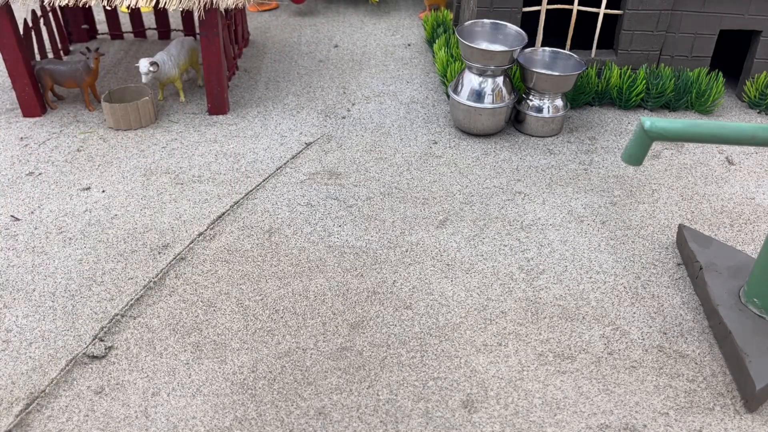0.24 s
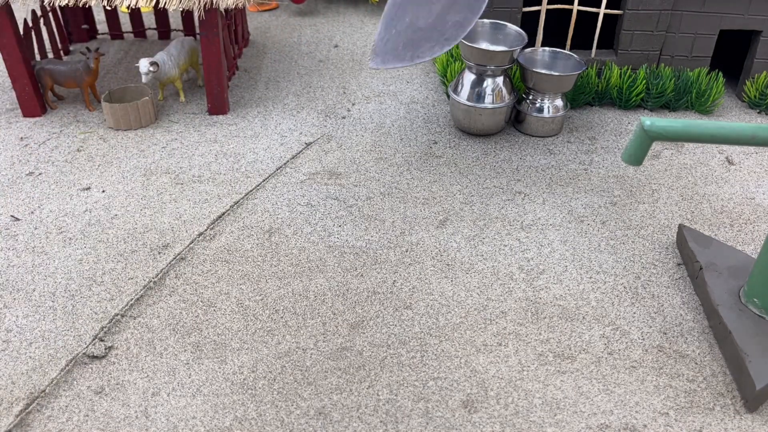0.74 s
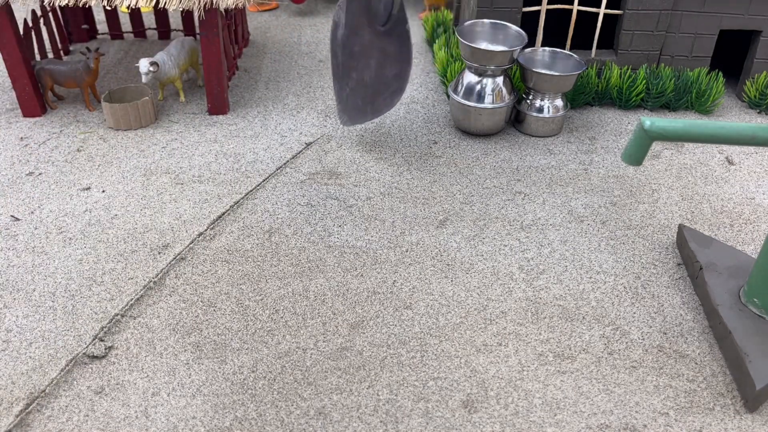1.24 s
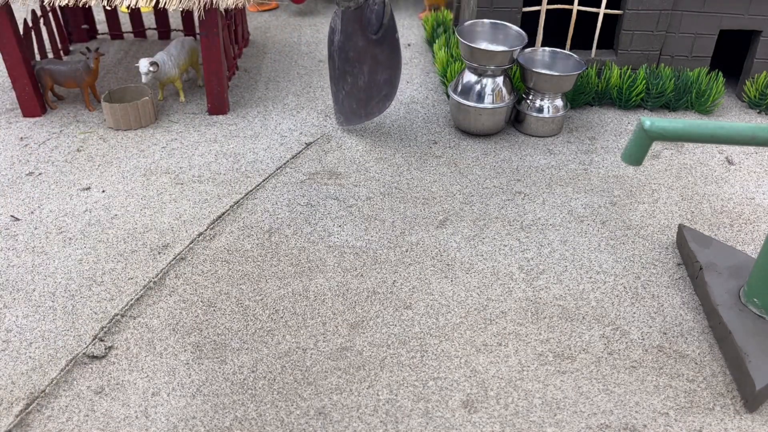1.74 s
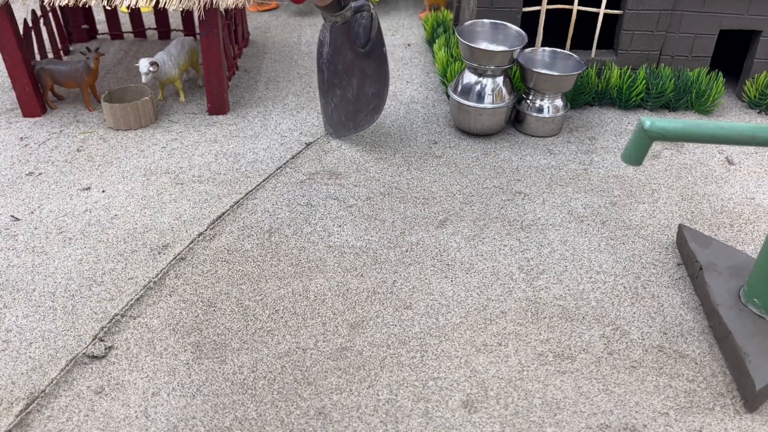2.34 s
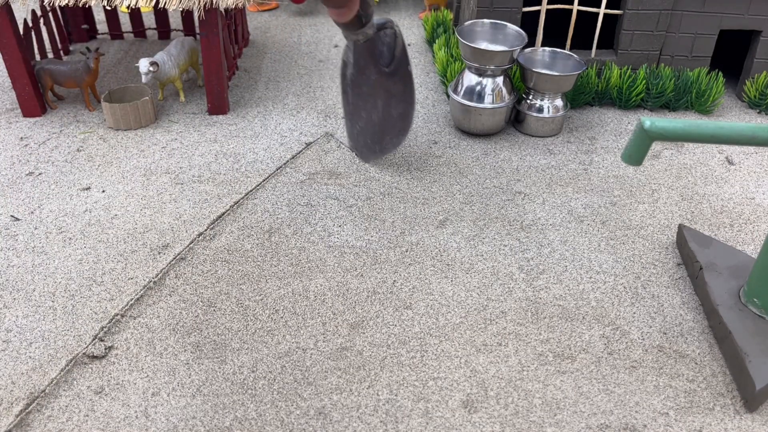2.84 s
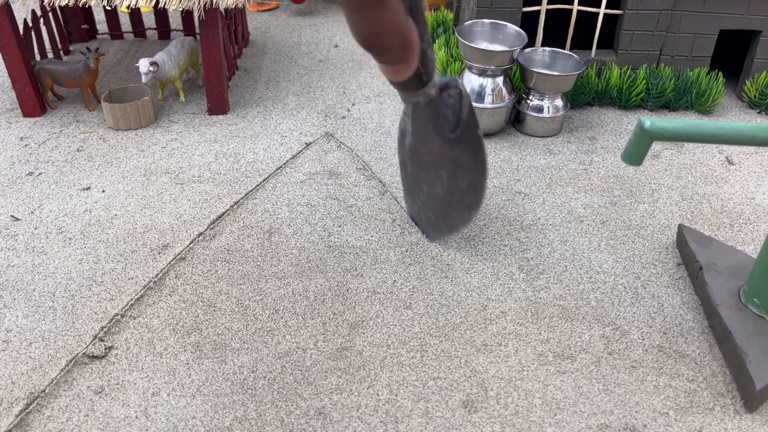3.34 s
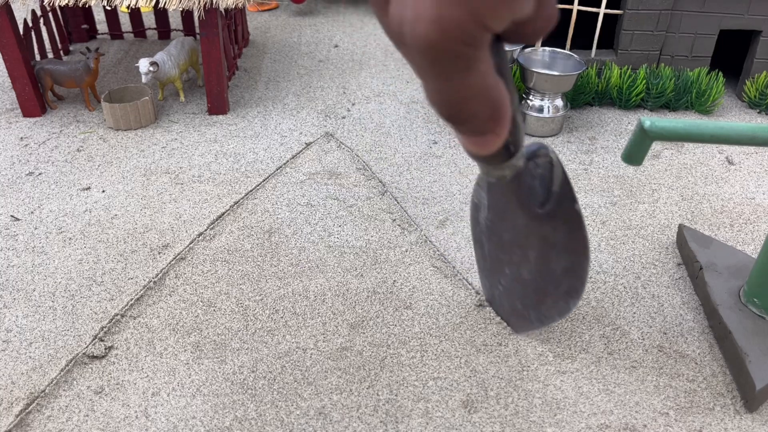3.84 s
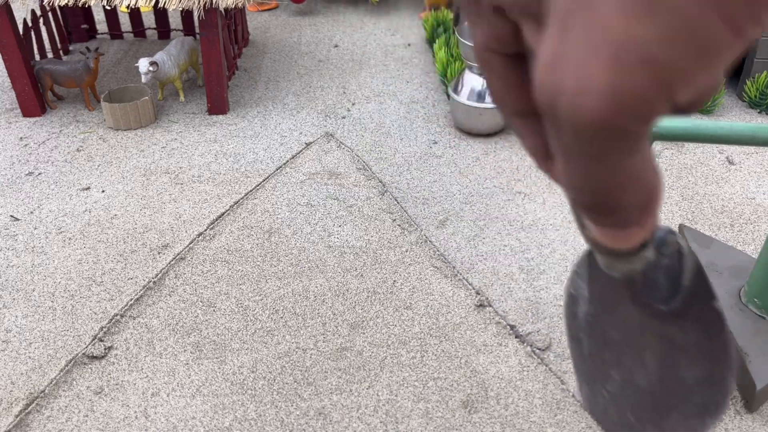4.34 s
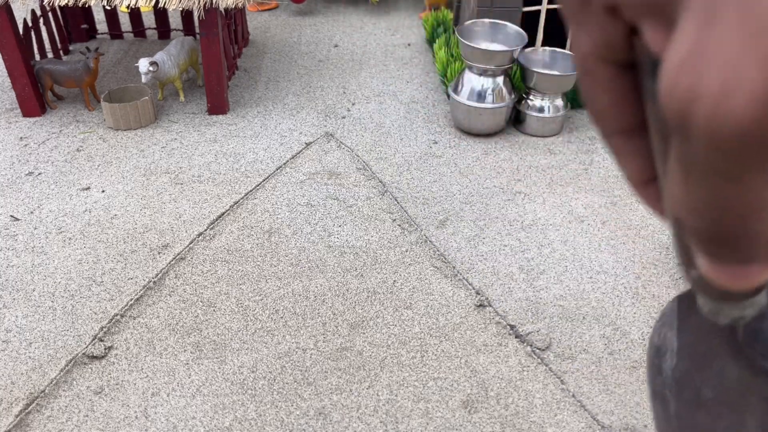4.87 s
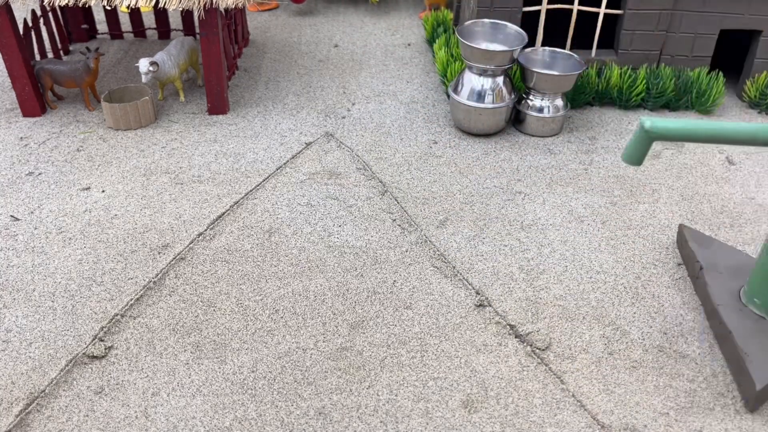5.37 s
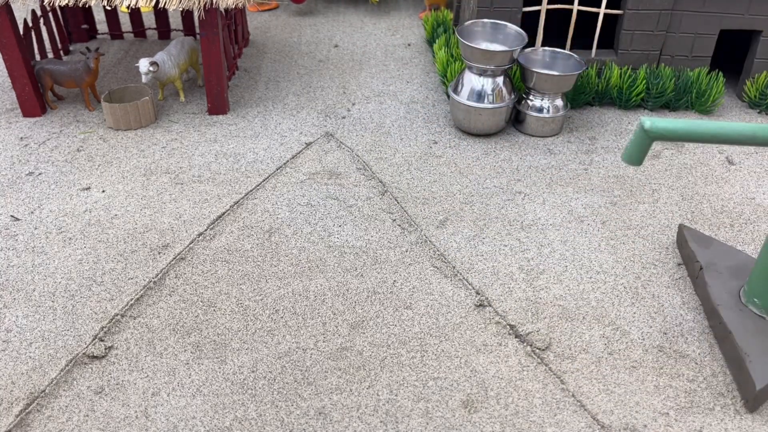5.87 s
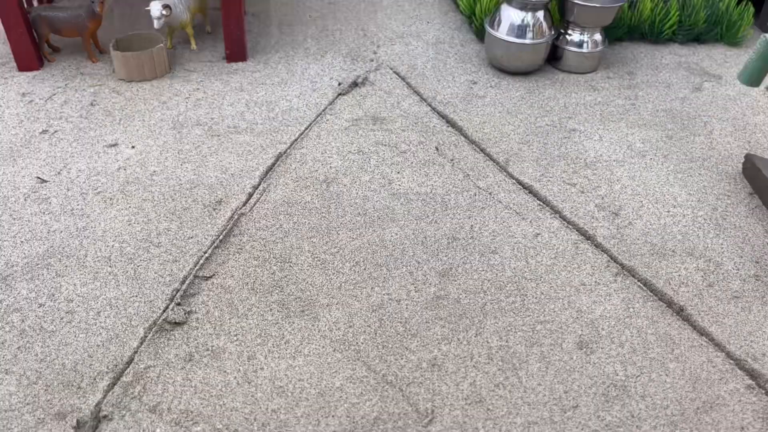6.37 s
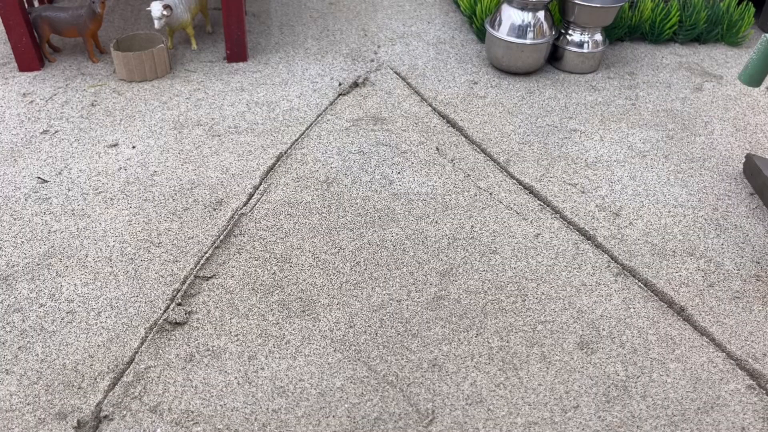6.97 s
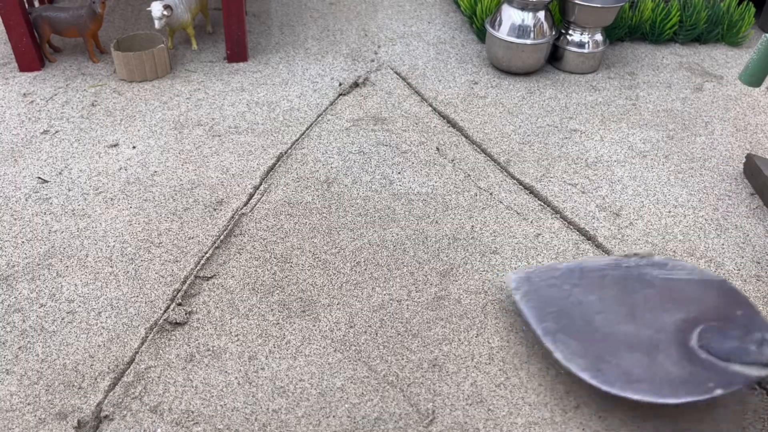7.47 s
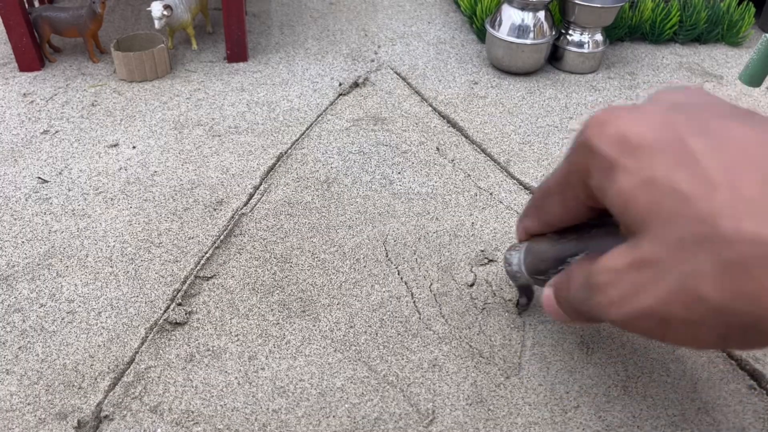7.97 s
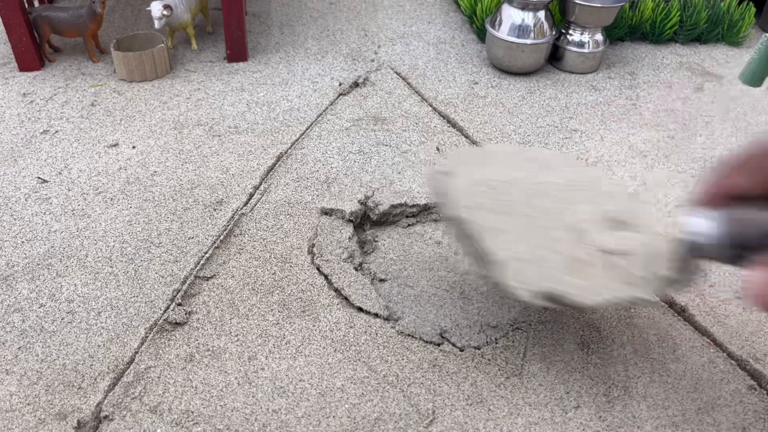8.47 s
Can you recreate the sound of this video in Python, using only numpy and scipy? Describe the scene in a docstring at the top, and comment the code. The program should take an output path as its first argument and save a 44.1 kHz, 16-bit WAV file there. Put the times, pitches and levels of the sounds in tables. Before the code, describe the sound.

Bright echoing bird chirps ring outdoors over two gritty scrapes of metal through sand, a faint scooping crunch, and a low engine hum cutting in and out.

```python
"""Trowel in damp sand, with birds and an engine

A small steel trowel is dragged twice through damp sand, then pushed in to lift a scoop: random
grain clicks are filtered into a fine hiss and a coarser rasp that rings the blade.
Birds whistle left and right as gliding sines with an echo tail from the trees, over quiet air noise.
A far engine drones in two stretches, cut in and out abruptly: two beating tones plus filtered noise."""
import sys
import numpy as np
from scipy import signal
from scipy.fft import rfft, irfft
from scipy.io import wavfile
from scipy.ndimage import uniform_filter1d

SR = 44100
rng = np.random.default_rng(int(sys.argv[2]) if len(sys.argv) > 2 else 0)


def generate_wav(sig):
    """Save sig (samples, or channels by samples) to the path in sys.argv[1] as 16-bit PCM at SR."""
    pcm = np.round(np.clip(np.atleast_2d(sig).T, -1, 1) * 32767).astype(np.int16)
    wavfile.write(sys.argv[1], SR, pcm)


N = 384111
TIME = np.arange(N) / SR   # seconds
HZ = np.maximum(np.arange(N // 2 + 1) * SR / N, 1)   # the frequency of each spectrum bin

# Air: tone colour (f/Hz, relative level/dB)
AIR_COLOUR = [(15, -59), (25, -12.5), (71, -3.5), (164, -10), (215, -3), (274, -5), (368, -4), (399, -5),
              (433, -3), (1080, -13), (1620, -22), (8350, -29), (15500, -24.5)]
# Air: how alike left and right are (f/Hz, likeness 0 to 1)
AIR_LIKENESS = [(60, 0.84), (290, 0.99), (640, 0.89), (1400, 0.84), (3000, .05)]
AIR_DB = -61

# Straight bird notes (start t/s, length t/s, first pitch f/Hz, last pitch f/Hz, level/dB,
# rise in level over the note/dB, left minus right level/dB, left microphone's lead t/microseconds)
BIRD_NOTES = [ (0.222, 0.052, 2820, 2704, -45, 2.5, 2, 146), (0.355, 0.011, 2290, 2230, -53.5, -1, 21, 143),
              (0.774, 0.028, 4050, 3812, -30.5, -5.5, -15, -168),
              (0.947, 0.041, 5700, 5700, -67, -4, -19, -168), (0.966, 0.05, 4150, 4095, -29, 6, -6.5, -168),
              (1.028, 0.016, 4000, 3886, -32.5, 3, -5, -168),
              (1.181, 0.043, 4100, 3803, -32, 10.5, -3.5, -168),
              (1.253, .02, 3750, 3620, -35, -2.5, -1.5, -168),
              (1.363, .025, 8100, 8280, -58.5, -1.5, 27, 144.5), (1.383, .03, 7480, 7380, -54, 1, 28, 143),
              (1.403, 0.065, 2830, 2600, -41, -6, -1.5, 149),
              (1.426, 0.018, 7030, 7060, -28.5, -8, 17, 138), (1.426, 0.016, 4120, 4010, -34, 1, -10, -168),
              (1.464, 0.033, 6200, 6420, -31.5, 10, 1, 150), (1.693, 0.056, 2280, 2220, -58.5, 1, 8, -4),
              (1.935, 0.075, 2230, 2267, -51.5, 4, 12, 1), (2.09, 0.11, 2015, 1955, -38.5, 7.5, -7, -15),
              (2.133, .06, 2720, 2727, -52, 3, -6, 7), (2.204, 0.04, 6720, 6650, -49, 16.5, -11.5, -168),
              (2.226, 0.011, 10050, 10050, -33.5, -13, -40, -168),
              (2.222, .014, 10900, 10900, -44, -10, -34, -168), (2.245, 0.038, 2380, 2250, -52, -1, 0, -2),
              (2.283, 0.06, 3650, 3520, -50, -7, -1, -7), (2.337, 0.12, 2950, 2950, -59, 8.5, 2, -3),
              (2.481, 0.14, 2430, 2350, -52, -8, 7, -3), (2.562, 0.1, 2086, 2086, -55.5, -4, -3, 0),
              (2.859, .075, 1920, 1893, -38, -1.5, -6, -2), (3.428, 0.031, 3620, 3630, -56.5, -4, 3, 1),
              (3.407, 0.34, 2374, 2284, -67.5, -1, -1, 1), (3.928, .08, 2240, 2325, -66, -1, 1, 5),
              (4.314, 0.098, 2010, 2070, -49, -12.5, 2, 0), (4.872, 0.018, 7760, 7800, -35.5, -5, -12, 8),
              (4.921, .03, 7720, 7620, -28, -15, -9, 1), (4.926, 0.031, 5860, 5760, -32.5, -8, -1, -5),
              (5.314, 0.021, 4900, 5120, -35.5, 10, 0.5, 3),
              (5.365, 0.021, 2930, 3080, -39.5, -1.5, -11, -1),
              (5.402, .012, 4460, 4345, -34.5, 9.5, -6, 5), (5.53, 0.027, 6600, 6650, -57, -3, 2.5, -2.5),
              (5.542, 0.019, 6130, 6080, -48, -1, 21, -1), (5.561, 0.018, 5300, 4990, -32, 1.5, 0, 1),
              (5.584, .03, 4280, 4280, -39.5, 2.5, 3.5, -2), (5.743, .04, 4030, 3940, -43, 5, -12, 3),
              (5.757, 0.014, 2960, 3053, -25.5, -2, 2, 2), (5.792, 0.018, 4420, 4290, -33.5, -2, 6.5, 2),
              (5.811, 0.03, 3250, 3397, -27, 6, -9, 3.5), (5.875, .044, 3590, 3306, -22, -2.5, 3.5, 1),
              (5.917, 0.016, 4330, 4350, -44, -1, 6, 3.5), (6.061, 0.02, 4880, 4660, -25.5, -3, -1, 3),
              (6.088, 0.0098, 5310, 5250, -25.5, -10, -3, -2),
              (6.091, 0.023, 5500, 6080, -36.5, -15.5, 0, 0.5),
              (6.255, 0.043, 2330, 2413, -52.5, -6, -34, 0), (6.383, 0.01, 3610, 3570, -33, 2, 11, -3.5),
              (6.404, 0.048, 2990, 3220, -47.5, 0, 5, 1), (6.426, 0.038, 3630, 3504, -27.5, -4.5, -1, 0),
              (6.509, 0.026, 4990, 5105, -24.5, 12, 0.5, -2),
              (6.743, 0.077, 7650, 7820, -50.5, 0, -11, 6.5), (6.765, 0.023, 8380, 8260, -47, 2, 9.5, 1.5),
              (6.775, 0.062, 7400, 7430, -50, -11.5, 2, 0), (6.825, 0.014, 7830, 7200, -51.5, 3, -4, -9),
              (6.792, 0.027, 7000, 6700, -60, -2, 4, 1.5), (6.975, .012, 3590, 3500, -40, 7, 6.5, 3.5),
              (7.023, .012, 3580, 3460, -24.5, 2, 2, 2.5), (7.043, .018, 3270, 3240, -40.5, -6, 4, 2.5),
              (7.086, .025, 3580, 3580, -42, -2, -13, 1), (7.111, .026, 5110, 5097, -36, 13.5, -2, 1),
              (7.399, 0.038, 7550, 7680, -59.5, 8, -13, -1),
              (7.475, 0.0099, 7600, 7500, -52.5, -5, -4.5, 0.5), (7.623, 0.042, 3510, 3070, -44, -2, -9, 0),
              (7.665, 0.018, 3180, 3266, -35.5, 2, -11, -2), (7.773, 0.03, 5050, 5220, -21, -6, -0.5, 5),
              (7.799, 0.013, 4900, 4670, -23.5, -6, 3, -2), (8.234, 0.068, 2920, 2810, -40, 2, -23, 0),
              (8.257, 0.037, 3540, 3650, -34.5, -6, 6, 0), (8.4, 0.024, 3170, 2910, -32, -2, 2.5, -1.5),
              (8.405, 0.027, 3650, 3570, -38, 3, 5, 0), (8.482, 0.032, 2770, 2700, -35.5, -6, 7, -2),
              (8.584, .025, 2680, 2636, -49.5, -5, 10, 0), (8.629, .016, 11150, 10980, -28, 0, 0, 8),
              (8.643, .055, 2720, 2770, -53.5, 6, 10, 2), ]
# Slurred whistles that bend as they go (left minus right level/dB, left microphone's lead
# t/microseconds, list of points (t/s, pitch f/Hz, level/dB))
BIRD_SLURS = [ (1.5, 143, [(1.515, 5664, -29), (1.542, 5840, -21), (1.56, 5560, -23), (1.576, 5750, -35.5),
              (1.606, 5910, -23), (1.626, 5890, -33.5), (1.642, 5700, -31), (1.655, 5720, -43)]),
              (1.5, 139, [(1.917, 7800, -35), (1.93, 7000, -25), (1.94, 7060, -18.5), (1.968, 5710, -19),
              (2.0, 5390, -16.5), (2.028, 5130, -27.5), (2.055, 5130, -15), (2.085, 4250, -10),
              (2.105, 4135, -25), (2.132, 4232, -13.5)]), (3, 4.5, [(5.13, 2990, -30.5), (5.15, 2993, -31),
              (5.185, 3020, -28.5), (5.203, 2844, -20)]), (8, -1.5, [(5.333, 4160, -31), (5.352, 4067, -18),
              (5.372, 3630, -33.5), (5.392, 3520, -19)]), (-.5, -6, [(5.603, 4690, -29.5),
              (5.63, 4820, -13.5), (5.645, 5000, -19.5), (5.662, 5040, -28)]),
              (-2.5, -5.5, [(6.556, 4850, -30.5), (6.582, 4443, -17), (6.598, 4384, -13.5),
              (6.622, 4385, -18.5)]), (0, 3, [(7.16, 4930, -28), (7.176, 4550, -32.5), (7.192, 4700, -21),
              (7.208, 4365, -21), (7.222, 4320, -30.5), (7.25, 4860, -38)]), (-1, -3, [(7.826, 4600, -29),
              (7.845, 4330, -24), (7.862, 4364, -22), (7.89, 4450, -20), (7.912, 4710, -28.5)]), ]
NOTE_RISE_S, NOTE_FALL_S = 0.03, 0.0032
NOTE_RISE_DB = 34.5      # climb during the rise: slow at first, steep at the last
NOTE_SMOOTH_S = 0.004    # averaging time that rounds off jumps in level
WAVER, WAVER_S = 0.0068, 0.0069   # pitch wobble as a share of the pitch, and its smoothing time
WARBLE = 0.05            # extra wobble on wide slides
AHEAD_US = 70            # birds with a smaller lead than this, in microseconds, are ahead

# Trees: levels of the birds' direct sound, of the scatter, and of what crosses to the other side
DIRECT_DB, WOOD_DB, ACROSS_DB = -2.6, -2.2, -37.5
WOOD_BUILD_S = 0.0013
WOOD_T60_S, WOOD_BEND_S = 0.36, 0.49   # time to fall 60 dB by the steady part alone; time to lose 20 dB more
WOOD_ALIKE_S = 0.022                   # how soon the two sides stop being alike
TAIL_HIGH_HZ, TAIL_HIGH_T60_S = 6700, 0.68   # extra fall of the tail's highs

# Engine stretches (start t/s, end t/s, lower tone f/Hz, beat f/Hz, moment of a beat crest t/s)
DRONE_A = (2.365, 5.52, 63.8, 1.45, 3.33)
DRONE_B = (7.09, 8.71, 79.7, 4.8, 7.96)
# Their tones (level at the start/dB, level at the end/dB, upper tone against the lower/dB)
TONES_A, TONES_B = (-48.5, -56, -7), (-56, -48, -0.92)
# Narrow noise lines: low ones of the engine, and in the first stretch also faint high whistling
# ones of unknown source (f/Hz, width f/Hz, rms level/dB)
LINES_A = [(87.6, 5.3, -56), (101.6, 4.2, -56.5), (143.8, 1.9, -58), (172.2, 1.9, -59.5), (216, 3.4, -66),
           (282.6, 2.05, -67.5), (363, 1.7, -69), (456.4, 0.64, -67.5), (2820, 20, -82), (3560, 43, -80.5),
           (4230, 64, -77), (4700, 27, -82)]
LINES_B = [(61, 6.4, -55.5), (136.7, 7.3, -70), (191, 7.3, -64.5), (238, 4.9, -58.5)]
# Colour of the steady wash under each drone (f/Hz, relative level/dB)
WASH_A = [(15, -53), (25, -40), (46, -7), (69, -7.5), (227, -5.5), (340, -16.5), (445, -18.5), (495, -17.5),
          (762, -20.5), (1850, -28), (2300, -30.5), (2560, -33.5), (15500, -48.5)]
WASH_B = [(15, -61), (25, -45), (86, -18), (118, 3), (355, -13.5), (430, -11), (478, -23), (592, -13.5),
          (644, -12), (4000, -38.5), (5200, -81), (8800, -120)]
WASH_A_DB, WASH_B_DB = -51.5, -56.5

# Lines scored in the sand (start t/s, length t/s, level/dB)
DRAGS = [(2.481, 1.008, -31.5), (4.219, 1.051, -29.5)]
# One drag gathers speed, then lifts off (share of its length, grit relative level/dB, blade body relative level/dB)
DRAG_COURSE = [(0, -48, -45.5), (.05, -32.5, -29.5), (.2, -19.5, -20), (.5, -12, -18.5), (.68, -1.5, -17.5),
               (.83, -1, -15.5), (.92, -8.5, -23.5), (.97, -15, -27), (1.0, -40, -38), (1.08, -45, -58)]
# Sand brushed before the dig (start t/s, length t/s, grit level/dB, blade body level/dB)
BRUSHES = [(7.11, .12, -74.5, -79), (7.413, 0.069, -70.5, -74)]
# The dig (t/s, grit level/dB, blade body level/dB)
DIG = [(7.53, -71.5, -75.5), (7.6, -66, -70), (7.75, -48.5, -52.5), (7.91, -42.5, -42.5),
       (8.11, -41.5, -44.5), (8.35, -46.5, -49.5), (8.44, -47, -47), (8.535, -54, -53.5), (8.61, -71, -71),
       (8.66, -78.5, -73.5)]
# Colours of grit and blade body, before the blade rings (f/Hz, relative level/dB)
DRAG_GRIT = [(1800, -24), (3000, -6), (4500, -7), (5300, -4), (6200, -8), (8000, -6), (9500, -1.5),
             (12000, -2.5), (12800, -7), (13600, -10), (14500, -4), (15600, 2), (16500, 0)]
DRAG_BODY = [(180, -30), (300, -2), (806, -2), (982, 2), (1300, -3), (2050, 0), (2280, -1.5), (2470, 1),
             (3720, -4.5), (5240, -0.5), (7000, -9.5), (9100, -12.5), (15400, -120)]
DIG_GRIT = [(2700, -5.5), (4500, -4), (5600, -0.5), (7300, 5.5), (8500, 3), (10200, 2.5), (12000, -3),
            (13100, -11.5), (14200, -5), (15600, -1), (16500, 4.5)]
DIG_BODY = [(240, -41), (400, -19), (697, -7), (884, -1), (1150, -1), (1490, 2.5), (1760, -1), (2480, 1),
            (2840, 0), (6000, -8.5), (7800, -67), (13200, -120)]
# Resonances of the steel blade (f/Hz, width f/Hz, lift in level/dB)
BLADE = [(570, 52, 4.5), (1000, 71, 1), (1715, 100, 3.5), (2150, 69, 4), (2394, 52, 8), (2860, 50, 3.5),
         (3680, 64, 4), (4060, 250, 1), (5300, 110, 4.5), (7180, 500, 2.5), (9750, 1000, 6.5),
         (10780, 1100, 4), (11880, 370, 6), (15330, 620, 7.5)]

CUTOFF_HZ = 15740


def from_db(db):
    """Turns decibels into a gain to multiply by."""
    return 10 ** (np.asarray(db) / 20)


def rms_one(x):
    """Scales a sound to an rms (average strength) of 1."""
    return x / np.sqrt(np.mean(x ** 2) + 1e-20)


def at_hz(points):
    """Reads a (Hz, value) table at every frequency, on a log-frequency axis."""
    hz, values = np.array(points).T
    return np.interp(np.log(HZ), np.log(hz), values)


def bell(hz, width_hz):
    """Resonance-shaped bump: 1 at its centre, one half at half the width to each side."""
    return 1 / (1 + (2 * (HZ - hz) / width_hz) ** 2)


def shaped(x, gain):
    """Filters x by one gain per frequency, then scales it to an rms of 1."""
    return rms_one(irfft(rfft(x) * gain, N))


def gains(rows, fade_s):
    """Turns rows of (s, dB, ...) into gain curves, with fades just outside the first and last row."""
    s, *columns = np.transpose(rows)
    inside_s = np.minimum(TIME - s[0], s[-1] - TIME)
    gate = np.clip(inside_s / fade_s + 1, 0, 1)
    return [gate * from_db(np.interp(TIME, s, column)) for column in columns]


def air():
    """Still air among the trees: filtered noise, alike left and right in the bass, unrelated in the treble."""
    mid, side = rfft(rng.standard_normal((2, N))) * from_db(at_hz(AIR_COLOUR))
    alike = np.clip(at_hz(AIR_LIKENESS), 0, 1)
    common = np.sqrt(1 + alike) * mid
    opposed = np.sqrt(1 - alike) * side * [[1], [-1]]
    return from_db(AIR_DB) * rms_one(irfft(common + opposed, N))


def birds():
    """Bird song: straight notes and slurred whistles, each a gliding sine at its own place."""
    calls = []
    for s, length, from_hz, to_hz, db, swell_db, pan_db, lead_us in BIRD_NOTES:
        calls.append(([s, s + length], [from_hz, to_hz], [db, db + swell_db], pan_db, lead_us))
    for pan_db, lead_us, bend in BIRD_SLURS:
        calls.append((*np.transpose(bend), pan_db, lead_us))
    out = np.zeros((2, N))
    for call in calls:
        at, sound = whistle(*call)
        out[:, at] += sound
    return out


def whistle(s, hz, db, pan_db, lead_us):
    """A wavering, gliding sine, placed by level and arrival time; returns its time slice and sound."""
    at = slice(int((s[0] - NOTE_RISE_S) * SR), min(int((s[-1] + NOTE_FALL_S) * SR), N))
    t = TIME[at]

    smoothing = np.hanning(int(WAVER_S * SR))
    wobble = rms_one(np.convolve(rng.standard_normal(SR // 2), smoothing, "same"))[:len(t)]
    depth = WAVER
    if abs(lead_us) < AHEAD_US:   # only the birds ahead warble
        depth += WARBLE * np.log(max(hz) / min(hz))
    pitch = np.interp(t, s, hz) * (1 + depth * wobble)
    cycles = np.cumsum(pitch) / SR
    left_lead = pitch * [[lead_us * 1e-6], [0]]   # in cycles, left then right
    phase = 2 * np.pi * (cycles + left_lead)

    early = np.clip((s[0] - t) / NOTE_RISE_S, 0, 1)   # 1 at the start of the rise, 0 at its end
    edge = np.clip(np.minimum(2 - 2 * early, 1 + (s[-1] - t) / NOTE_FALL_S), 0, 1)
    level_db = np.interp(t, s, db) - NOTE_RISE_DB * np.sqrt(early)
    level_db = uniform_filter1d(level_db, int(NOTE_SMOOTH_S * SR))
    level = from_db(level_db) * np.sin(np.pi / 2 * edge) ** 2

    left = 1 / (1 + from_db(-2 * pan_db))   # left share of the power
    sides = np.sqrt([[2 * left], [2 - 2 * left]])
    return at, sides * level * np.sin(phase)


def wood(x):
    """Dense scatter off trunks and leaves: a noise tail that builds up, then dies, growing unlike left to right."""
    t = TIME[:SR]
    noise, alike = rng.standard_normal((2, SR)), np.exp(-t / WOOD_ALIKE_S)
    # early scatter is alike in both microphones, so it still comes from the bird's side
    noise[1] = alike * noise[0] + np.sqrt(1 - alike ** 2) * noise[1]
    lows = signal.sosfilt(signal.butter(2, TAIL_HIGH_HZ, fs=SR, output="sos"), noise)
    highs = signal.sosfilt(signal.butter(2, TAIL_HIGH_HZ, "high", fs=SR, output="sos"), noise)
    # the minus sign joins the two filters smoothly where they meet
    scatter = lows - highs * from_db(-60 * t / TAIL_HIGH_T60_S)

    # the tail falls slowly at first, then ever faster
    fall_db = -60 * t / WOOD_T60_S - 20 * (t / WOOD_BEND_S) ** 2
    tail = scatter * (1 - np.exp(-t / WOOD_BUILD_S)) * from_db(fall_db)
    tail = tail / np.sqrt(np.sum(tail ** 2, axis=1, keepdims=True))
    spread = x + from_db(ACROSS_DB) * x[::-1]
    return from_db(WOOD_DB) * signal.fftconvolve(spread, tail, axes=1)[:, :N]


def engine(stretch, tones, lines, wash, wash_db):
    """Engine stretch: two close firing tones throb as they beat, heard with narrow noise lines and a wash."""
    start, end, tone_hz, beat_hz, crest_s = stretch
    first_db, last_db, upper_db = tones
    level, on = gains([(start, first_db, 0), (end, last_db, 0)], fade_s=0.0031)
    turn = 2 * np.pi * (TIME - crest_s)   # both tones line up at the crest
    lower = np.sin(tone_hz * turn)
    upper = from_db(upper_db) * np.sin((tone_hz + beat_hz) * turn)
    tone = np.sqrt(2) * (lower + upper)

    noise = rng.standard_normal((2, N))
    wavering = sum(from_db(db) * shaped(noise[0], bell(hz, width)) for hz, width, db in lines)
    steady = from_db(wash_db) * shaped(noise[1], from_db(at_hz(wash)))
    return level * tone + on * (wavering + steady)


def grains(per_s, size_db):
    """Sand grains slipping on steel: random clicks of uneven size and either sign."""
    sizes = from_db(size_db * np.minimum(rng.exponential(1, N), 5))
    signs = rng.choice([-1, 1], N)
    return sizes * signs * (rng.random(N) < per_s / SR)


def drift(rate):
    """Slow random swings, about rate of them a second, with an rms of 1."""
    return shaped(rng.standard_normal(N), bell(0, 2 * rate))


def patchy(x, patchy_db, rate):
    """Uneven colour: overlapping half-octave bands each swell and sink on their own."""
    place = np.clip(2 * np.log2(HZ / 250), 0, 12)   # band number, counted up from 250 Hz
    out, whole = 0, rfft(x)
    for band in range(13):
        share = np.maximum(1 - abs(place - band), 0)
        out = out + irfft(whole * share, N) * from_db(patchy_db * drift(rate))
    return out


def trowel():
    """Trowel in sand: fine grit hisses at the edge, and coarser slips sound the blade body."""
    blade = from_db(sum(db * bell(hz, width) for hz, width, db in BLADE))
    drags = [np.array(DRAG_COURSE) * [length, 1, 1] + [start, db, db] for start, length, db in DRAGS]
    digs = [DIG]
    for start, length, grit_db, body_db in BRUSHES:
        digs.append([(start, grit_db, body_db), (start + length, grit_db, body_db)])

    out = 0
    # strokes, the two colours, then extra gain in dB for grit and body
    kinds = [(drags, DRAG_GRIT, DRAG_BODY, 0.6, 4.5),
             (digs, DIG_GRIT, DIG_BODY, 5.5, 6.5)]
    for strokes, grit, body, grit_db, body_db in kinds:
        fine, coarse = grains(per_s=13000, size_db=1.0), grains(per_s=9000, size_db=1.0)
        hiss = from_db(grit_db) * shaped(fine, blade * from_db(at_hz(grit)))
        rasp = from_db(body_db) * shaped(coarse, blade * from_db(at_hz(body)))
        for rows in strokes:
            edge_level, body_level = gains(rows, fade_s=0.051)
            out = out + edge_level * hiss + body_level * rasp
    return patchy(out, patchy_db=2.2, rate=9.0)   # pressure and sand change along the stroke


def scene():
    """Adds it all up: birds and air in stereo, trowel and engine in the centre."""
    song = birds()
    drone = engine(DRONE_A, TONES_A, LINES_A, WASH_A, WASH_A_DB)
    drone = drone + engine(DRONE_B, TONES_B, LINES_B, WASH_B, WASH_B_DB)
    return air() + from_db(DIRECT_DB) * song + wood(song) + drone + trowel()


def record(dry):
    """Cuts the top of the treble away with a steep low-pass filter."""
    low_pass = signal.ellip(12, 0.5, 80, CUTOFF_HZ, fs=SR, output="sos")   # 0.5 dB ripple, 80 dB cut
    return signal.sosfilt(low_pass, dry)


dry = scene()
out = record(dry)
generate_wav(out)
```